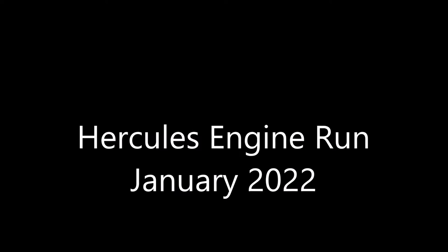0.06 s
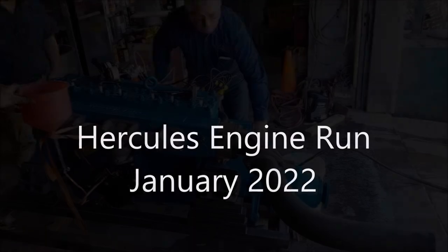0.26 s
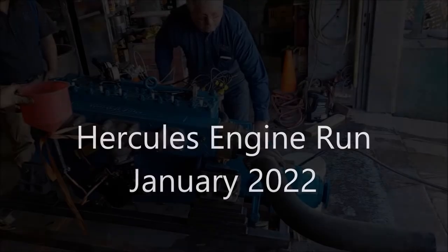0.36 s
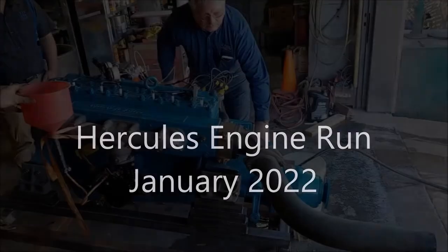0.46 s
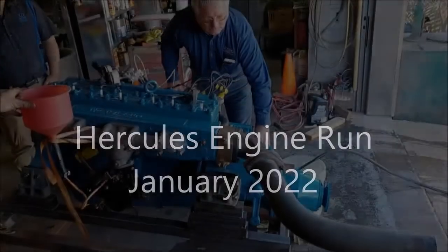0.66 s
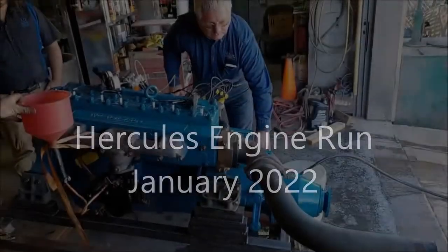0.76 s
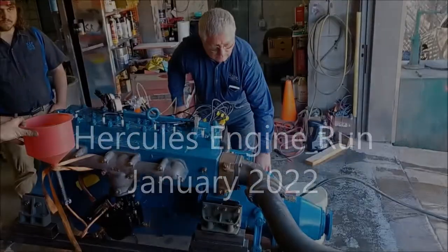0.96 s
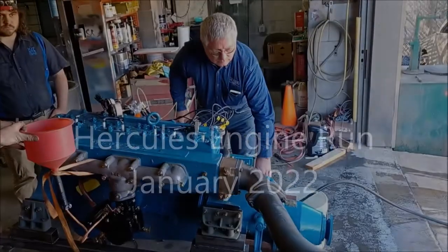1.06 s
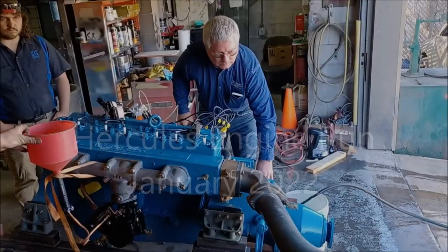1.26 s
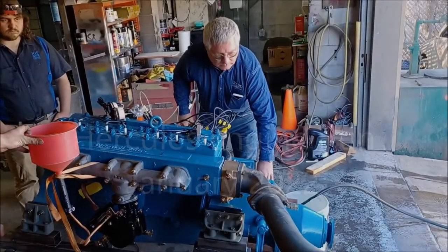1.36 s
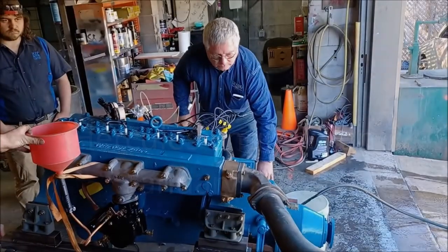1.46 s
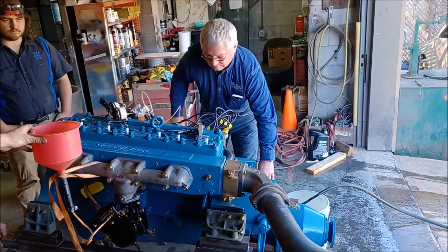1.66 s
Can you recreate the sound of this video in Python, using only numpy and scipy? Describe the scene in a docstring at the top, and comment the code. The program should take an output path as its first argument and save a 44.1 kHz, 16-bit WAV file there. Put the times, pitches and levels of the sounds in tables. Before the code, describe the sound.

A big engine cranks with a fast run of hissing, metallic chuffs, each thudding down the exhaust pipe, then winds down with two more spaced apart. Low mechanical churning and soft hiss lie underneath, with the puffs slightly right in a workshop.

```python
"""Six quick, sharp puffs of gas, then two lone ones: a big six-cylinder engine turns over and slows.
Each puff swells, rings in its own metal passages and goes with a thump down the long exhaust pipe.
Under them the works churn, wheeze and tick, and a soft hiss fills the workshop.
Heard on a stereo pair in the room, with the puffs a little to the right."""
import sys
import numpy as np
from scipy import signal
from scipy.fft import rfft, irfft
from scipy.io import wavfile
from scipy.ndimage import uniform_filter1d

SR = 44100
rng = np.random.default_rng(int(sys.argv[2]) if len(sys.argv) > 2 else 0)


def store_pcm(level_fs):
    """Save levels as 16-bit WAV."""
    pcm = np.round(np.clip(level_fs, -1, 1) * 32767).astype(np.int16)
    wavfile.write(sys.argv[1], SR, np.atleast_2d(pcm).T)


N = 74970

# a cylinder blows off: time_s, rise_s, chuff_db, rasp_db, hiss_db, tilt_db_per_octave, right_over_left_db
PUFFS = [(0.271, 0.0093, -33.5, -12, -23, -1, 0.5), (0.337, 0.012, -33, -23, -25.5, -1, 0),
         (0.401, 0.0078, -28, -23, -19, 1, -1.5), (0.473, 0.0053, -24.5, -20, -23.5, -0.5, 1),
         (0.547, 0.0088, -29.5, -16, -22.5, 1.5, 0), (.635, .012, -27, -29.5, -22.5, -2.5, 1),
         (1.038, 0.016, -30, -31, -27.5, 4, -1.5), (1.349, 0.015, -37, -34.5, -35.5, 1.5, -2)]
# the bright hiss in puffs and ticks: frequency_hz, level_db
HISS_COLOUR = [(1500, -11), (2800, -8), (3800, 8), (4500, 5), (6000, 0.5), (8200, -3), (9500, -2),
               (12500, -2.5), (15500, -3.5)]
# how alike the two microphones hear the puffs, and the room: frequency_hz, correlation
PUFF_LIKENESS = [(100, 0.85), (700, 1), (2000, 0.85), (5000, 0.077), (15000, 0.057)]
ROOM_LIKENESS = [(60, 0.92), (250, 0.88), (600, 0.69), (1000, 0.31), (2000, 0)]


def puffs():
    """Turbulent jets of gas: chuff, rasp and a shorter hiss, brighter in some puffs than in others."""
    # the low and the middle part of a jet: frequency_hz, level_db
    chuff_colour = [(150, -25), (250, -0.5), (380, -36), (480, -7.5), (680, 3), (950, -6.5), (1100, -2.5),
                    (1600, -53)]
    rasp_colour = [(850, -22), (1100, -7), (1300, 8), (1600, 12), (1900, 2.5), (2350, 2), (2700, -4),
                   (4500, -31.5)]
    hiss_lead_s, hiss_pivot_hz, flutter_db = 0.0002, 7000, 0.5
    octaves = np.maximum(np.log2(bins() / hiss_pivot_hz), -2)
    out = 0
    for s, rise_s, chuff_db, rasp_db, hiss_db, tilt_db, pan_db in PUFFS:
        tilted_hiss = colour(HISS_COLOUR) * from_db(tilt_db * octaves)
        colours = colour(chuff_colour), colour(rasp_colour), tilted_hiss
        chuff, rasp, hiss = (noise(c * castings(), PUFF_LIKENESS) for c in colours)
        body = (from_db(chuff_db) * chuff + from_db(rasp_db) * rasp) * swell(s, rise_s, fall_s=0.011)
        top = from_db(hiss_db) * hiss * swell(s - hiss_lead_s, rise_s, fall_s=0.0091)
        out = out + (body + top) * pan(pan_db)
    flutter = noise(resonance(0, half_width_hz=242), PUFF_LIKENESS)[0]
    return out * from_db(flutter_db * flutter)


def passages():
    """Each puff sounds the metal passages it blows through: wavering tones, the low ones lingering."""
    # passage resonances, one list per puff: pitch_hz, level_db
    passage_modes = [
        [(430, -31), (1184, -26), (1297, -21), (1421, -11.5), (1679, -21), (1932, -17), (2158, -31)],
        [(436, -31), (936, -24.5), (1937, -15.5), (2147, -15), (2336, -23), (3563, -27), (5000, -32)],
        [(1001, -24.5), (1297, -22), (1464, -23), (2018, -21.5), (3057, -33)],
        [(678, -28), (1001, -25.5), (1232, -22), (1679, -44), (2018, -17), (2234, -14), (2330, -18.5),
         (5550, -31), (5760, -28.5), (8257, -29.5)],
        [(818, -28), (968, -20), (1275, -18.5), (1437, -19.5), (1679, -39), (2255, -21), (3945, -43),
         (8301, -24)],
        [(497, -27), (640, -24.5), (700, -22.5), (979, -25.5), (1275, -39), (1733, -20.5), (2018, -20),
         (2417, -19), (3940, -21)],
        [(460, -27.5), (769, -30), (1475, -29), (1814, -24), (1975, -27), (2217, -30), (2885, -27),
         (3740, -31.5), (7003, -34.5)],
        [(457, -44), (947, -30), (1265, -38.5), (2616, -39), (2847, -39.5), (3116, -42)],
    ]
    ring_db, ring_s, ring_halved_hz = -8, 0.047, 2030
    out = 0
    for (s, rise_s, *_, pan_db), modes in zip(PUFFS, passage_modes):
        blown = swell(s, rise_s, fall_s=0.011)
        age_s = times() - s
        for hz, db in modes:
            band = resonance(hz, half_width_hz=1.9 + 0.013 * hz)
            tone = steady(noise(band, PUFF_LIKENESS), samples=500)
            decay_s = ring_s / (1 + hz / ring_halved_hz)
            ring = from_db(ring_db) * np.exp(-np.abs(age_s) / decay_s) * (age_s > 0)
            out = out + from_db(db) * tone * np.maximum(blown, ring) * pan(pan_db)
    return out


def exhaust():
    """Each pressure pulse thuds and leaves the long pipe ringing; the gas flow keeps it droning."""
    # pulses entering the pipe: time_s, strength_db, thud_db
    pulses = [(0.213, -1.5, -40), (0.287, -14, -42), (0.349, -0.5, -27), (0.419, 4, -29), (0.489, 2.5, -26),
              (0.577, -26, -31), (.640, 2, -29), (1.044, 4, -36), (1.359, -1.5, -52)]
    # the pipe's modes: pitch_hz, gain_db, t60_s
    pipe_modes = [(139.9, -34.5, 0.66), (162, -45, 0.39), (216.1, -36.5, 0.32), (275, -33, 0.14),
                  (296, -51.5, 0.67), (452.4, -40, 0.22), (637, -44, 0.4)]
    # the bass of a thud: frequency_hz, level_db
    thud_colour = [(20, -30), (35, -30), (50, 8), (62, -6), (90, -37), (140, 14), (220, -12.5), (400, -23)]
    # the pipe's hollow drone: time_s, level_db
    drone_level = [(.17, -36), (.23, -32), (.34, -36.5), (.41, -67), (.49, -34), (.58, -39), (.85, -57),
                   (1.12, -49.5), (1.26, -43.5), (1.47, -46), (1.54, -67), (1.70, -48)]
    rings = sum(from_db(db) * strike(pulses, hz, t60_s) for hz, db, t60_s in pipe_modes)
    bass = steady(noise(colour(thud_colour), ROOM_LIKENESS), samples=1200)
    thuds = bass * sum(from_db(db) * swell(s, rise_s=0.015, fall_s=0.039) for s, _, db in pulses)
    drone = steady(noise(resonance(279.3, half_width_hz=33), ROOM_LIKENESS), samples=2500)
    return low_cut(rings, hz=106) + thuds + drone * level(drone_level)


def works():
    """The crank rumbles, pistons and gears churn, with a few dull knocks."""
    # spectra of the crank and the churning: frequency_hz, level_db
    crank_colour = [(20, -36), (36, -21), (48, -2), (62, 8.5), (95, 4.5), (140, 3), (200, -23), (500, -46)]
    churn_colour = [(20, -43), (70, -43), (140, -10), (180, -5), (270, -2.5), (380, -5.5), (500, -1.5),
                    (900, -6), (1300, -5), (2300, -5), (3000, -11.5), (6000, -20.5), (16000, -28.5)]
    # their rise and fall: time_s, level_db
    crank_level = [(.17, -55), (.28, -42), (.38, -45), (.56, -39.5), (.69, -36), (.76, -54), (.92, -52),
                   (.95, -57), (1.02, -51), (1.06, -48), (1.20, -53), (1.32, -65), (1.42, -51),
                   (1.70, -62.5)]
    churn_level = [(.17, -38.5), (.25, -34.5), (.30, -25.5), (.50, -30), (.62, -32.5), (.72, -37.5),
                   (.82, -40.5), (.98, -44.5), (1.12, -41.5), (1.30, -46.5), (1.46, -48.5), (1.56, -57),
                   (1.70, -57)]
    # knocks in the works: start_s, strength_db
    blows = [(.201, -25), (.958, -28), (1.251, -24.5), (1.360, -25)]
    crank = steady(noise(colour(crank_colour), ROOM_LIKENESS), samples=2500) * level(crank_level)
    churn = noise(colour(churn_colour) * np.sqrt(castings()), ROOM_LIKENESS) * level(churn_level)
    knocks = strike(blows, hz=263, t60_s=0.051)
    return crank + churn + low_cut(knocks, hz=260)


def castings():
    """The many small resonances of the castings: random peaks and dips, as a gain for every bin."""
    depth_db, spacing_hz = 3.5, 130.5
    heights = rng.standard_normal(1000)
    return from_db(depth_db * np.interp(bins() / spacing_hz, np.arange(len(heights)), heights))


def wheezes():
    """Weaker, duller leaks of air between the puffs."""
    # leaks: time_s, half_length_s, level_db
    leaks = [(0.206, 0.008, -31.5), (0.953, 0.015, -39.5), (1.109, 0.022, -39), (1.242, 0.012, -36),
             (1.454, 0.019, -42), (1.67, 0.037, -44)]
    # the escaping air: frequency_hz, level_db
    leak_colour = [(150, -42), (330, 14.5), (520, 7), (800, 7.5), (1600, 7), (2400, 3), (3100, -11.5),
                   (4200, -3), (9000, -34), (16000, -35)]
    envelope = sum(from_db(db) * swell(s, half_s, half_s) for s, half_s, db in leaks)
    return noise(colour(leak_colour), ROOM_LIKENESS) * envelope


def ticks():
    """Faint bright ticks of loose metal."""
    # metal touching metal: time_s, level_db
    contacts = [(0.786, -39), (1.184, -42.5), (1.608, -53), (1.649, -43)]
    envelope = sum(from_db(db) * swell(s, rise_s=0.00135, fall_s=0.0027) for s, db in contacts)
    return noise(colour(HISS_COLOUR), ROOM_LIKENESS) * envelope


def from_the_right(x):
    """The jets reach the left microphone later and shaded."""
    # level difference between the microphones: frequency_hz, right_over_left_db
    shading = [(200, 0), (700, 2), (1500, 0), (2600, 3), (5000, 4.5), (8000, -1), (11000, 6.5),
               (15000, 12.5)]
    left_lag_s = 0.000327
    half_db = at_hz(shading, bins()) / 2
    delay = np.exp(-2j * np.pi * bins() * left_lag_s)
    return irfft(rfft(x) * [from_db(-half_db) * delay, from_db(half_db)], N)


def workshop(x):
    """Diffuse stereo reverberation, fed from the left channel, that dies band by band."""
    # the room's decay: frequency_hz, t60_s
    decay_times = [(60, 0.86), (300, 0.37), (1000, 0.18), (2200, 0.48), (5000, 0.25), (15000, 0.29)]
    # the room's tone: frequency_hz, level_db
    room_colour = [(60, 12.5), (300, 3), (700, 0), (2000, -3), (5000, -3), (8200, -3), (15000, -9.5)]
    build_s, centres_hz = 0.0012, np.geomspace(60, 15360, 9)
    wash = rfft(noise(1, ROOM_LIKENESS)) * colour(room_colour)
    onset = 1 - np.exp(-times() / build_s)
    tail = 0
    for hz, pick in zip(centres_hz, np.eye(len(centres_hz))):
        band = np.interp(np.log(bins()), np.log(centres_hz), pick)
        decay = onset * np.exp(-np.log(1000) * times() / at_hz(decay_times, hz))
        tail = tail + irfft(wash * band, N) * decay / np.sqrt(np.sum(decay ** 2))
    return signal.fftconvolve(x[:1], tail, axes=1)[:, :N]


def room_hiss():
    """A soft hiss all around the microphones."""
    # its spectrum: frequency_hz, level_db
    air_colour = [(200, -24), (1500, 0), (3500, -1), (5500, 9), (7600, 8.5), (8700, -6.5), (11000, 5),
                  (15500, 4.5)]
    # its rise and fall: time_s, level_db
    air_level = [(.17, -41.5), (.60, -42.5), (.80, -49), (.95, -48.5), (1.30, -50.5), (1.40, -46.5),
                 (1.48, -55.5), (1.57, -55.5), (1.635, -57.5), (1.655, -47), (1.70, -47)]
    return noise(colour(air_colour), ROOM_LIKENESS) * level(air_level)


def from_db(db):
    """Decibels to gain."""
    return 10 ** (np.asarray(db) / 20)


def pan(db):
    """Left and right gains, the right louder by db."""
    return from_db([[-db / 2], [db / 2]])


def times():
    """The time of every sample, in seconds."""
    return np.arange(N) / SR


def bins():
    """The frequency of every spectral bin, at least 1 Hz."""
    return np.maximum(np.arange(N // 2 + 1) * SR / N, 1)


def at_hz(points, hz):
    """Read a table on a log-frequency axis."""
    frequencies, values = np.transpose(points)
    return np.interp(np.log(hz), np.log(frequencies), values)


def level(points):
    """A level curve as a gain for every sample."""
    return from_db(np.interp(times(), *np.transpose(points)))


def colour(points):
    """A spectrum as a gain for every bin."""
    return from_db(at_hz(points, bins()))


def resonance(hz, half_width_hz):
    """Gain for every bin of a resonance peak whose skirts fall off gently."""
    return 1 / (1 + ((bins() - hz) / half_width_hz) ** 2)


def noise(gains, likeness):
    """Stereo noise of the given colour and left-right likeness; rms 1."""
    mid, side = rfft(rng.standard_normal((2, N)))
    alike = np.clip(at_hz(likeness, bins()), -1, 1)
    pair = np.sqrt(1 + alike) * mid + np.sqrt(1 - alike) * side * [[1], [-1]]
    x = irfft(gains * pair, N)
    return x / np.sqrt(np.mean(x ** 2))


def steady(x, samples):
    """Hold a narrow-band sound at an even strength while its pitch keeps wandering."""
    return x / np.sqrt(uniform_filter1d(np.mean(x ** 2, axis=0), samples) + 1e-6)


def swell(s, rise_s, fall_s, roundness=1.53):
    """A rounded rise to time s and a fall after it."""
    t = times() - s
    return np.exp(-np.abs(t / np.where(t < 0, rise_s, fall_s)) ** roundness)


def strike(rows, hz, t60_s):
    """Clicks of (start_s, strength_db) set one mode ringing."""
    clicks = np.full(N, 1e-18)
    for s, db, *_ in rows:
        clicks[int(s * SR)] += from_db(db)
    radius, angle = np.exp(-np.log(1000) / (t60_s * SR)), 2 * np.pi * hz / SR
    return signal.lfilter([0, np.sin(angle)], [1, -2 * radius * np.cos(angle), radius ** 2], clicks)


def low_cut(x, hz):
    """Roll off the bass below hz."""
    return signal.sosfilt(signal.butter(2, hz, "high", fs=SR, output="sos"), x)


def scene():
    """The engine in its workshop, as it reaches the microphones."""
    jets, rings = puffs(), passages()
    small_sounds = wheezes() + ticks()
    air = room_hiss()
    room = workshop(jets + small_sounds + from_db(-6) * rings)
    return from_the_right(jets + rings) + small_sounds + room + exhaust() + works() + air


def record(dry):
    """The sound cuts in after a moment of silence; peaks are clipped and the top is cut."""
    start_s, cutoff_hz = 0.166, 16000
    x = np.clip(dry * (times() > start_s), -1, 1)
    return signal.sosfilt(signal.ellip(12, .1, 80, cutoff_hz, fs=SR, output="sos"), x)


dry = scene()
out = record(dry)
store_pcm(out)
```